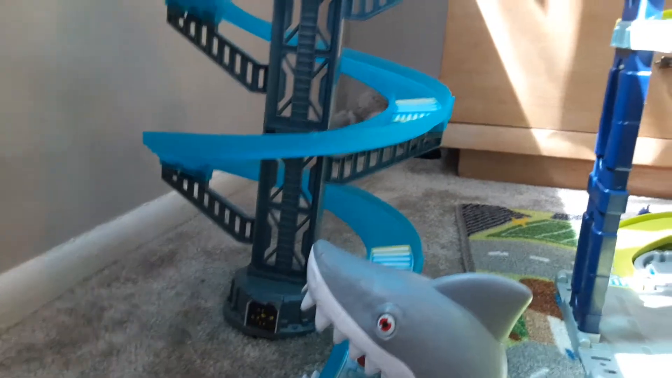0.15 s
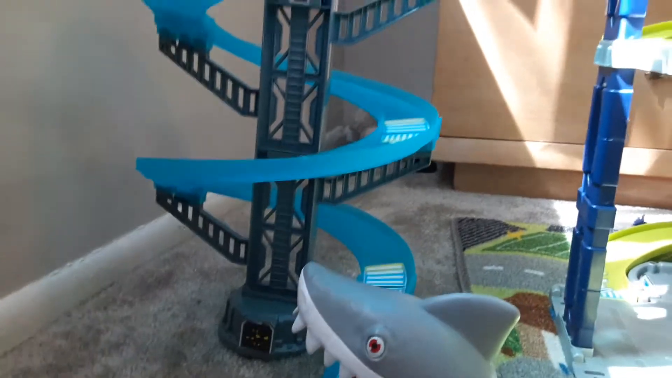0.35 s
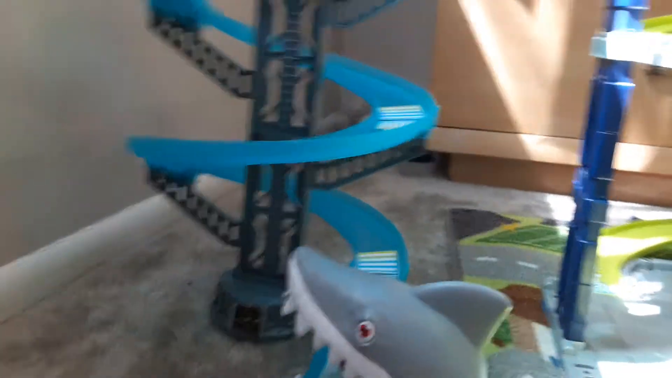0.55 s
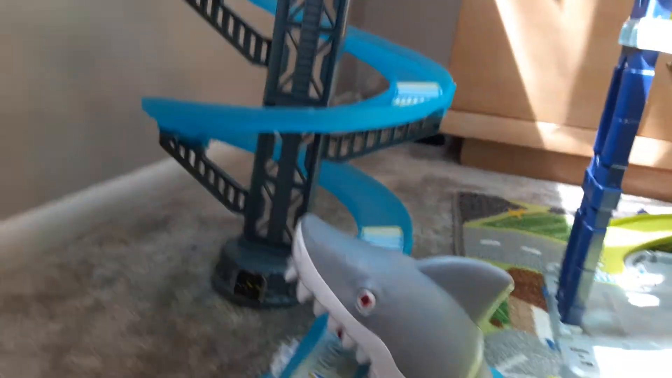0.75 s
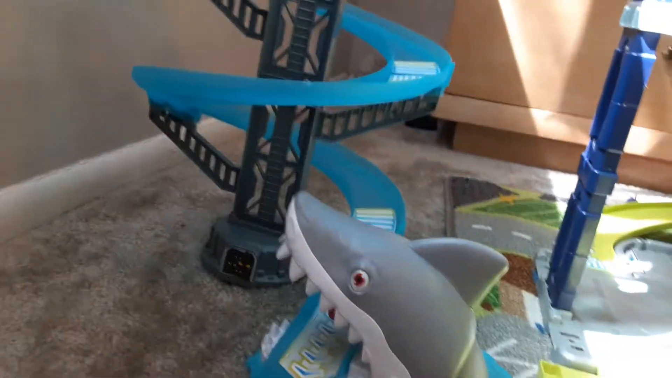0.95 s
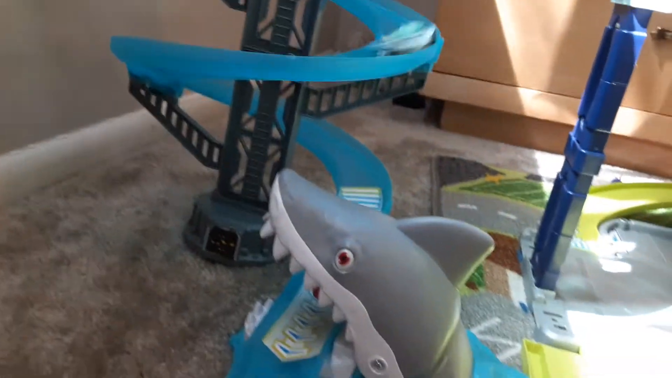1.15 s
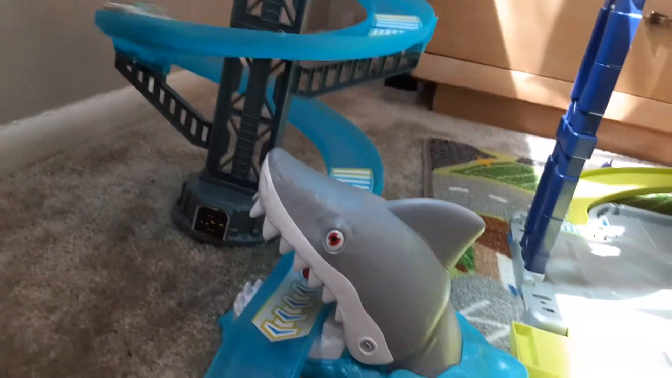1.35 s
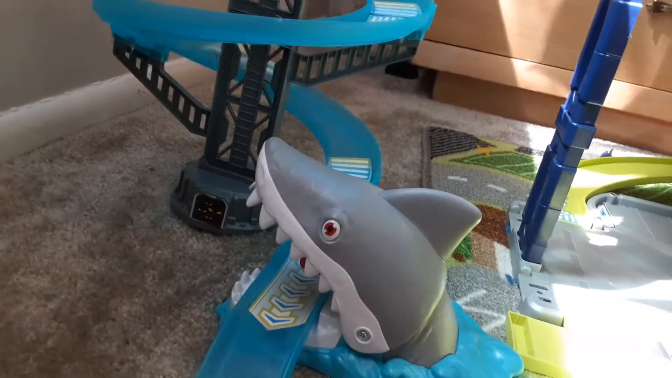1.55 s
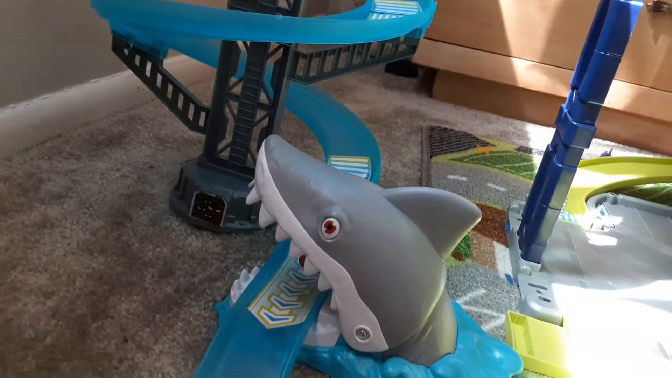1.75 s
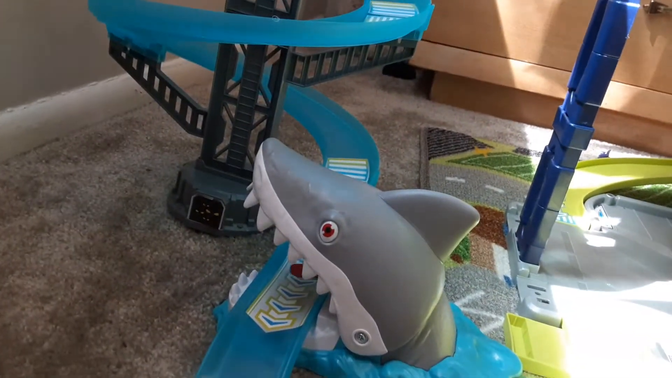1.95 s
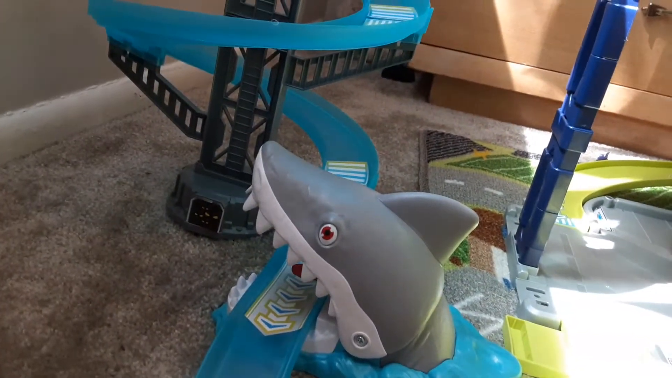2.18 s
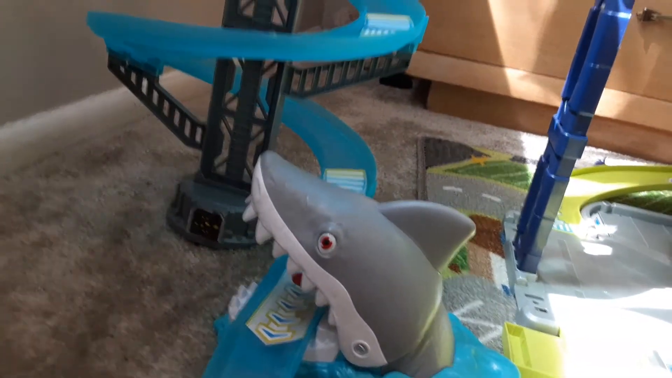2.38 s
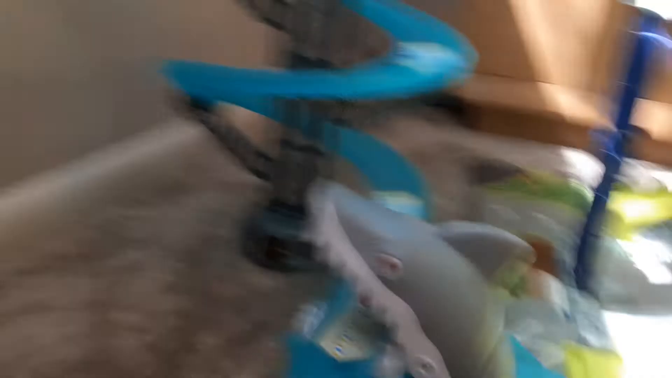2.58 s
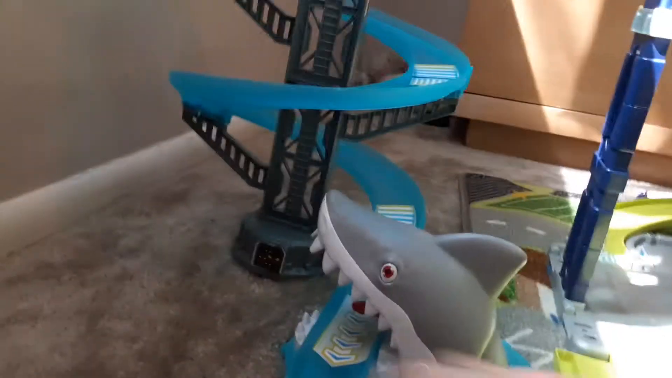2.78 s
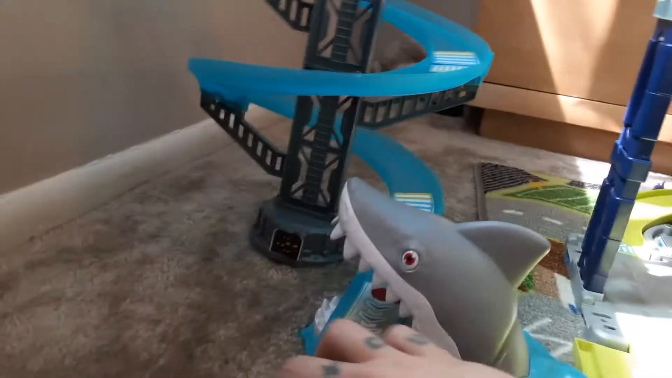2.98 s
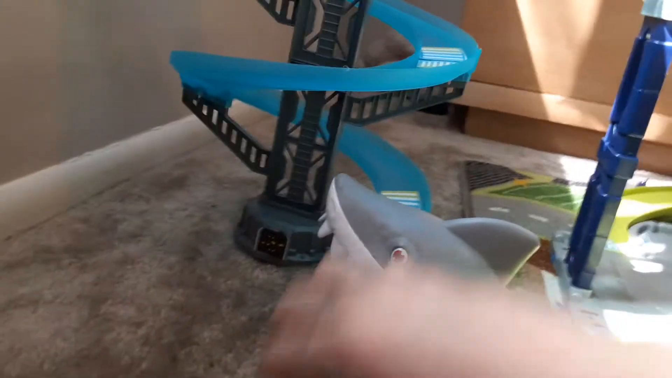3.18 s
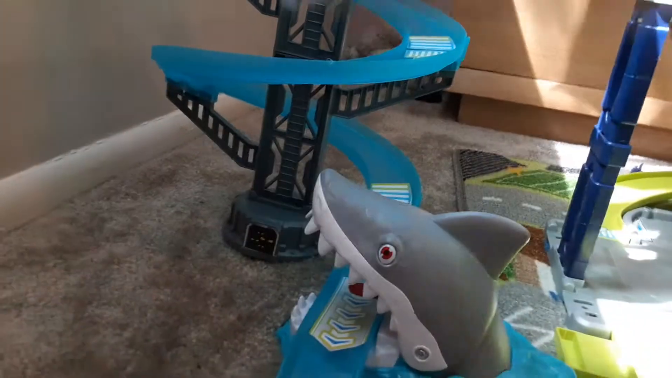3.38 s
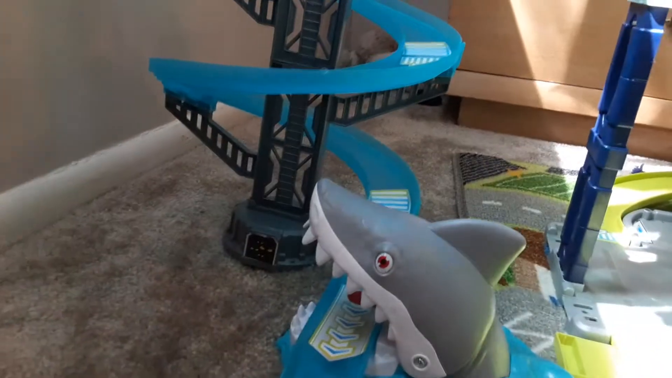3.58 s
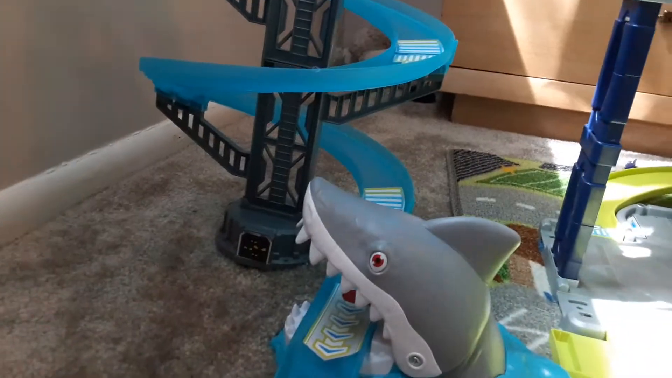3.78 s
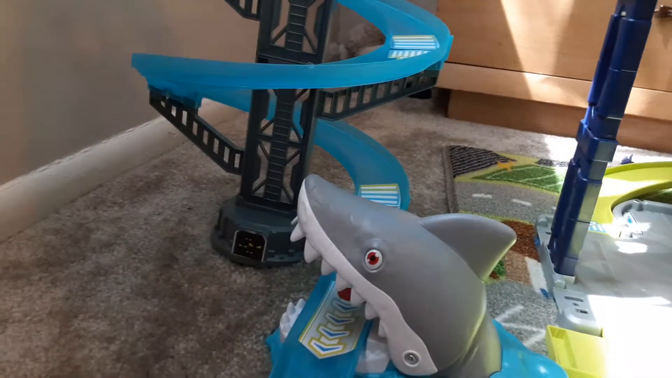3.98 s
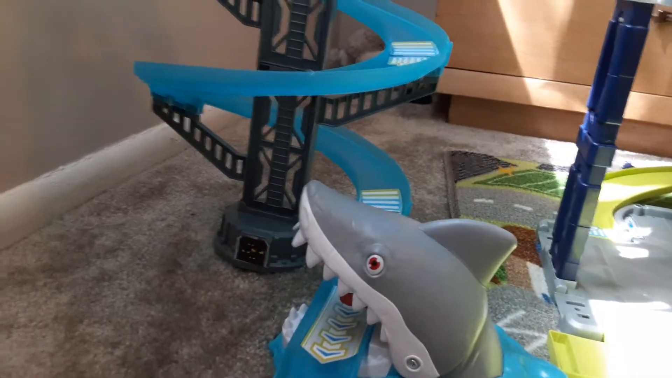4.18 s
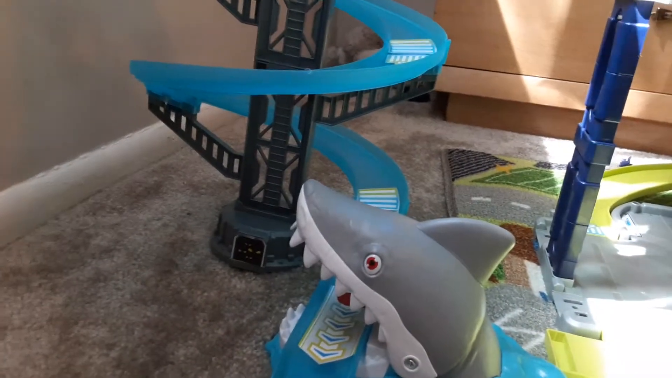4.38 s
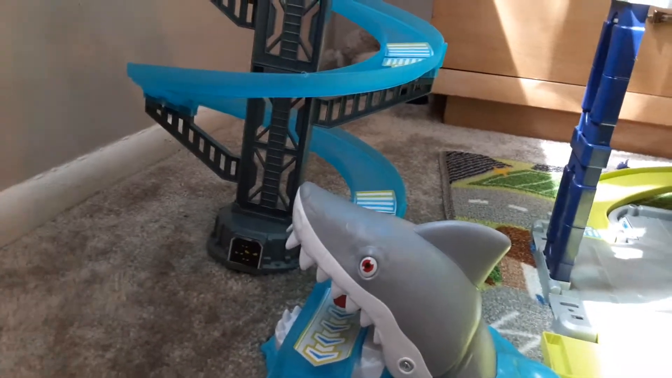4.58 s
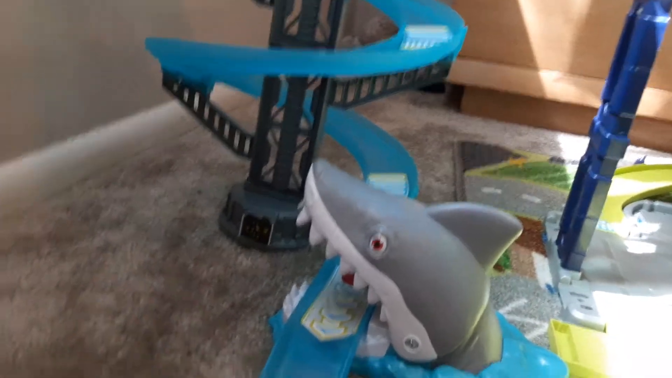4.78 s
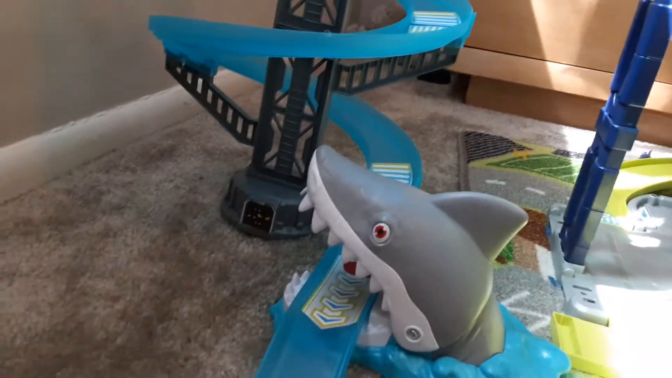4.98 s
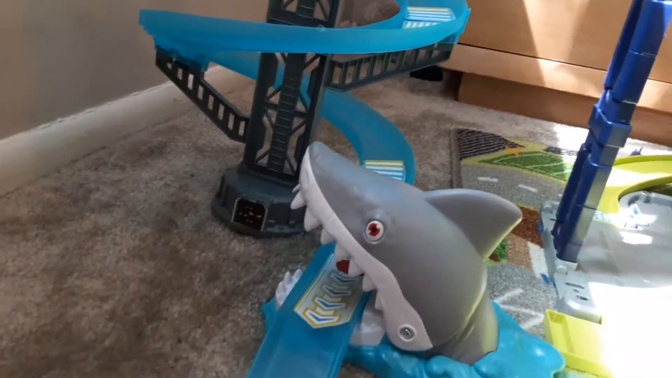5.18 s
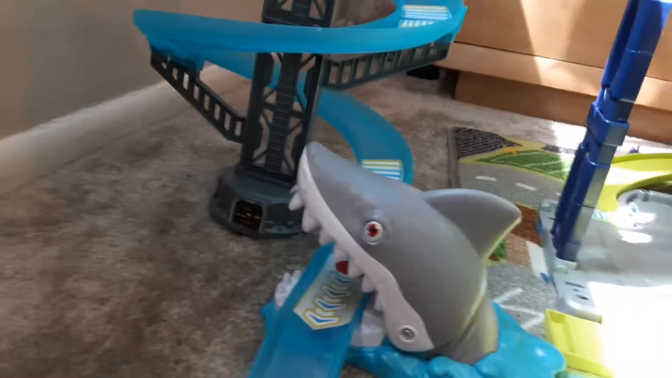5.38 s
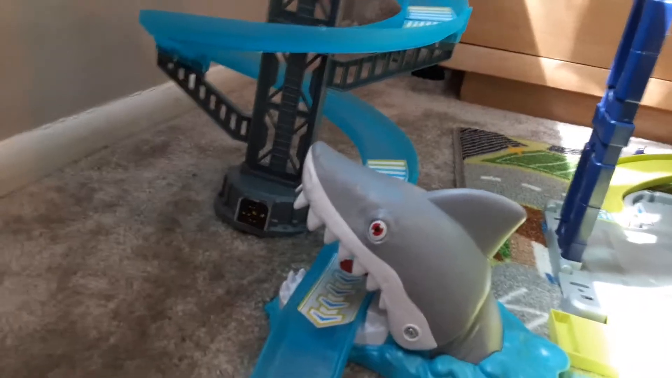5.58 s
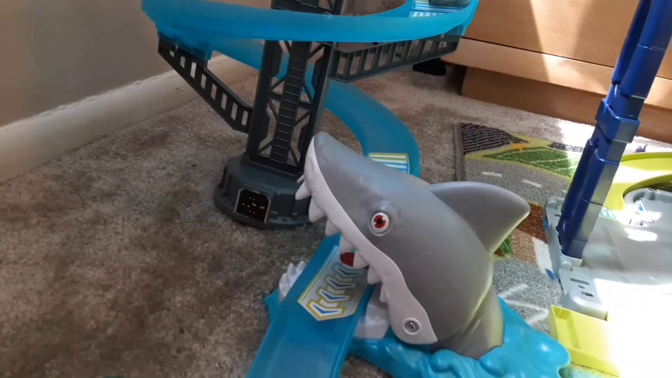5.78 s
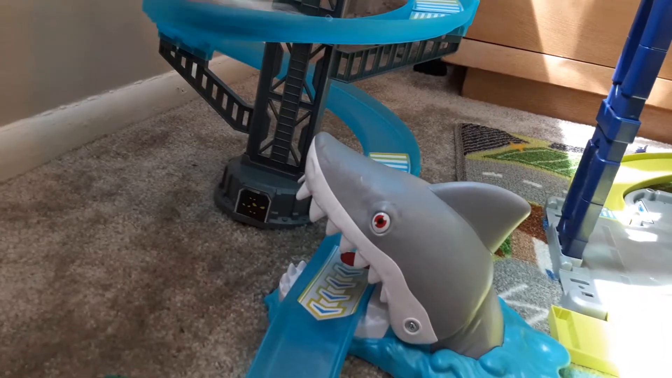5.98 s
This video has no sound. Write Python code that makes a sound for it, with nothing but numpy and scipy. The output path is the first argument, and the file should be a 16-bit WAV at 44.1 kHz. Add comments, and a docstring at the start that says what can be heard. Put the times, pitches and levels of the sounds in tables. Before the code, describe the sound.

Close by in a small, quiet room, hard little wheels rush down a spiral plastic track with a rising rattle, ending in a scrape and a quick hollow clatter. After a lull with faint cloth rustling, a toy car clicks onto the top of the plastic tower, is nudged along and rolls down again with a couple of knocks. A faint appliance hum lies underneath.

```python
"""Toy cars run down a plastic spiral ramp in a small carpeted room, over a low appliance hum.
The first rushes round ever quicker laps, its hard wheels pattering on the plastic, then skids and
clatters out through the hollow chute, leaving a faint metal ring. A sleeve rustles as an arm fetches it.
A car is set on the tower top with a few clicks, creeps off and gathers speed down the same course."""
import sys
import numpy as np
from scipy import signal
from scipy.fft import rfft, irfft
from scipy.io import wavfile

SR = 44100
rng = np.random.default_rng(int(sys.argv[2]) if len(sys.argv) > 2 else 0)


def bounce(signal):
    """Save signal as a 16-bit WAV file at the path given by the first command-line argument."""
    frames = np.transpose(np.atleast_2d(signal))
    limited = np.clip(frames, -1, 1)
    pcm = np.round(limited * 32767).astype(np.int16)
    wavfile.write(sys.argv[1], SR, pcm)


N = 266628

# appliance hum: (frequency [Hz], relative level [dB], beat depth [ratio], beat rate [Hz])
HUM_PARTIALS = [(59.2, -51.5, 0.51, 2.3), (95.3, -52, 0.13, 6), (117.4, -53.5, 1, 3.1)]
# still air of the room: (frequency [Hz], gain [dB])
AIR_COLOUR = [(20, -17), (40, -24.5), (60, -4), (120, 1), (170, -3.5), (250, -8), (400, -20), (900, -19.5),
              (2000, -31.5), (5000, -31), (8500, -47), (15000, -32.5)]
# room reverb: (frequency [Hz], t60 [s])
ROOM_DECAY = [(150, 0.46), (1200, .22), (4000, 0.25), (15000, 0.2)]
# rubbing cloth: (frequency [Hz], gain [dB])
CLOTH_COLOUR = [(180, -36.5), (300, -5), (527, -10.5), (676, -10.5), (942, -8.5), (1150, -12.5),
                (1660, -11), (9290, -12.5), (12300, -8), (15800, -12)]
# strokes of the arm: (time [s], half-width [s], level [dB], hiss trim [dB], left over right [dB])
SLEEVE_STROKES = [(2.468, 0.072, -77, 5.5, -4), (2.595, 0.041, -70.5, 9.5, -7), (2.82, 0.12, -66, 1.5, -1),
                  (3.04, 0.074, -62, -13, 0.5), (3.48, 0.085, -63, -1, 0.5), (3.76, 0.067, -62.5, -8, 0)]
# the whole toy rings as a car's weight lands: (time [s], level [dB], frequency [Hz], t60 [s])
TOY_RINGS = [(0.529, -44.5, 212, 0.61), (1.93, -64, 867, 2.0), (2.012, -26, 381, 0.016),
             (4.14, -46, 99.5, 0.45), (4.128, -44, 196, 0.27), (5.151, -43, 159, 0.36)]
# the car clacks as it is picked up, is set on the tower top and tips over the lip:
# (time [s], relative level [dB], treble [dB], t60 [s])
TOWER_CLACKS = [(3.0874, -33, 6.5, 0.033), (3.7768, -28, -0.5, 0.13), (3.8255, -30.5, -7, 0.081),
                (3.8506, -10.5, -6.5, 0.039), (3.868, -28, 2.5, 0.17), (3.9105, -24.5, -27, 0.059),
                (4.0008, -20, -11, 0.021), (4.0961, -36, -11, 0.11), (4.1131, -33.5, -4, 0.13),
                (4.1297, -13.5, -4.5, 0.045), (4.1425, -23.5, -1.5, 0.092), (4.179, -25, -5, 0.03),
                (4.2363, -31.5, -9, 0.058), (4.756, -31, -1, 0.04), (4.8075, -31, 2, 0.066)]
# broad tone of the car on the tower top: (frequency [Hz], gain [dB])
TOWER_TONE = [(150, -12), (400, -14.5), (1000, -8.5), (2500, -3), (5300, 3), (9000, -5.5), (12000, -3),
              (15800, -9.5)]
# resonances on that tone: (frequency [Hz], width [Hz], boost [dB])
TOWER_RESONANCES = [(1440, 230, 6.5), (2070, 460, 7), (2720, 300, 10), (3480, 240, 4), (4300, 69, 1.5),
                    (6660, 73, 1)]
# the running car hits joints and walls: (time [s], relative level [dB], treble [dB], t60 [s])
TRACK_BUMPS = [(1.139, -16, 10, 0.025), (1.707, -12.5, 3, 0.078), (1.7445, -15.5, 1, 0.06),
               (1.7702, -13.5, 3.5, 0.079), (1.7968, -12, 6.5, 0.099), (1.8125, -19.5, 8, 0.068),
               (1.824, -12, 5.5, 0.076), (1.843, -13.5, 7, 0.095), (1.8685, -15.5, 8, 0.08),
               (1.8865, -15, 7, 0.043), (1.9042, -13.5, 1.5, 0.06), (1.9312, -12.5, -10.5, 0.081),
               (1.9738, -11.5, 14, 0.013), (2.01, -29, 12, 0.058), (5.003, -20, 5, 0.035),
               (5.5174, -22.5, 7, 0.064)]
# broad tone of the chute at the bottom: (frequency [Hz], gain [dB])
CHUTE_TONE = [(150, -20), (350, -19.5), (700, -10.5), (1500, -10), (3000, -4), (5500, -2), (9000, -14.5),
              (15800, -15)]
# hollow resonances of the chute: (frequency [Hz], width [Hz], boost [dB])
CHUTE_RESONANCES = [(815, 150, 12.5), (1050, 49, 10), (1466, 190, 7), (1915, 600, 6), (2980, 200, 7),
                    (5420, 220, -2), (15270, 120, 5)]
# the car skids through the chute: (time [s], level [dB])
SKID_ENVELOPE = [(1.42, -41), (1.67, -28.5), (1.735, -36), (1.79, -47.5), (1.83, -29.5), (1.959, -24),
                 (1.969, -46.5)]
# wheels on plastic: (frequency [Hz], gain [dB])
WHEEL_TONE = [(120, -36.5), (200, -7.5), (547, -17), (788, -10.5), (1140, -10.5), (1440, -10), (1760, 4),
              (2080, -0.5), (2780, 0), (4010, -7), (5180, -4.5), (9470, -15.5), (12700, -10), (15800, -18)]
# ringing of the track sections: (frequency [Hz], width [Hz], boost [dB])
TRACK_RESONANCES = [(747, 45, 5.5), (967, 62, 9), (1825, 350, -5.5), (2050, 110, 6.5), (5000, 2900, 5)]
# rolling layers, a row each for rumble, boom, rush, bright rush and fizz:
# (level [dB], cut before the drop [dB], near-side lift [dB], twice-a-lap lift [dB])
ROLL_LAYERS = [(-47, 2, 0.5, -0.8), (-40, 5.5, -2.2, 3), (-30.5, 3.5, 0.1, 0.84), (-34, 2, 1, 1.94),
               (-37, 1, 1.4, 1)]
# the car is nudged along the tower top: (time [s], half-width [s], level [dB], treble [dB])
NUDGE_SWELLS = [(4.352, 0.036, -42, 0), (4.49, 0.038, -46.5, 3), (4.57, 0.059, -49.5, 3),
                (4.72, 0.09, -54.5, 6)]

RELEASES_S, RUN_S = [-0.005, 4.669], 1.705  # both runs share one course; times below count from release
PICKUP_S, PICKUP_POWER = 0.36, 0.52  # time constant and curve of the build-up
LIP_S, LIP_RISE_S, LIP_DB = 0.127, 0.0072, 4.5  # quieter until the car tips over the lip
LAPS_PER_S, LAPS_PER_S2, NEAR_LAP = 0.827, 0.774, 0.29  # starting pace, speed-up, nearest point of a lap
DROP_S, FADE_S = 0.544, 0.02  # drop onto louder track; the same fade ends the run
JOINTS_S, JOINT_WIDTH_S, JOINT_DB = [0.315, 0.565, 0.86, 1.151], 0.017, 5  # fizz over the track joints
HOLLOW_HZ, DIP_HZ, DIP_S, DIP_WIDTH_S = 1542, 188, 0.68, 0.014  # track note dips in the first far bend


def amp(db):
    """Decibels to gain."""
    return 10 ** (np.asarray(db) / 20)


def unit(x):
    """Scales to rms 1."""
    return x / np.sqrt(np.mean(x ** 2) + 1e-20)


def pan(db):
    """Left and right gains, the left louder by db."""
    return amp(np.array([[.5], [-.5]]) * db)


def bell(s, half_width_s):
    """A smooth swell of height 1 around time s."""
    return 1 / np.cosh(np.clip((np.arange(N) / SR - s) / half_width_s, -50, 50))


def ramp(s, length_s):
    """A fade from 0 to 1, starting at time s."""
    return np.clip((np.arange(N) / SR - s) / length_s, 0, 1)


def drift(top_hz):
    """A smooth random wobble of rms 1, no faster than top_hz."""
    t = np.arange(0, N + 64, 64) / SR
    wobble = sum(np.sin(2 * np.pi * (hz * t + rng.random())) for hz in np.geomspace(top_hz / 10, top_hz, 20))
    return unit(np.interp(np.arange(N) / SR, t, wobble))


def add(mix, s, sound):
    """Mixes a stereo sound in at time s."""
    part = mix[:, round(s * SR):][:, :sound.shape[1]]
    part += sound[:, :part.shape[1]]


def read(points, hz):
    """Reads a curve of (frequency [Hz], value) on a log-frequency axis."""
    point_hz, value = np.transpose(points)
    return np.interp(np.log(hz + 1), np.log(point_hz), value)


def body_db(tone, resonances, hz):
    """EQ curve of a plastic part: a broad tone with resonances standing on it."""
    return read(tone, hz) + sum(db / (1 + (2 * (hz - f) / width) ** 2) for f, width, db in resonances)


def colour(x, eq_db, size=4096):
    """Minimum-phase EQ whose gain is eq_db(hz)."""
    hz = abs(np.fft.fftfreq(size, 1 / SR))
    log_gain = np.log(amp(np.maximum(eq_db(hz), -100)))
    taps = np.fft.ifft(np.exp(np.conj(signal.hilbert(log_gain)))).real[:size // 2]
    return signal.oaconvolve(x, taps[None], axes=1)[:, :x.shape[1]]


def band(x, lo_hz, hi_hz):
    """Band-pass with soft edges."""
    hz = np.fft.rfftfreq(N, 1 / SR) + 1
    return irfft(rfft(x) / np.sqrt((1 + (lo_hz / hz) ** 12) * (1 + (hz / hi_hz) ** 12)), N)


def resonate(x, hz, width_hz):
    """A swept resonance: shift the curve hz down to zero, smooth, shift back."""
    carrier = np.exp(2j * np.pi * np.cumsum(hz) / SR)
    pole = np.exp(-np.pi * width_hz / SR)
    return 2 * (carrier * signal.lfilter([1 - pole], [1, -pole], x / carrier)).real


def stereo(common, left, right, alike, lag_samples=4, bass_hz=650):
    """Both sides share the bass and part of the treble; the shared sound reaches the right later."""
    shared = np.array([common, np.roll(common, lag_samples)])
    wide = np.sqrt(alike) * shared + np.sqrt(1 - alike) * np.array([left, right])
    lowpass = signal.butter(2, bass_hz, fs=SR, output="sos")
    return wide + signal.sosfiltfilt(lowpass, shared - wide, padtype=None)


def grit(per_s, spread_db, alike):
    """A stereo spray of tiny impacts of uneven size."""
    sprays = []
    for _ in range(3):
        size = amp(spread_db * np.minimum(rng.exponential(1, N), 4))
        sprays.append(unit(size * rng.choice([-1, 1], N) * (rng.random(N) < per_s / SR)))
    return stereo(*sprays, alike)


def background(waver_db=-0.16, wander_rad=0.3, air_db=-52.5, trim_db=-0.5, lull_db=-9):
    """A beating, wavering appliance hum over still air; the whole bed sinks for a while mid-scene."""
    t = np.arange(N) / SR
    hum = 0
    for hz, db, depth, beat_hz in HUM_PARTIALS:
        beat = 1 + depth * np.exp(2j * np.pi * (beat_hz * t + rng.random()) + 1j * drift(top_hz=4))
        tone = np.exp(2j * np.pi * hz * t + 1j * wander_rad * drift(top_hz=5.1))
        hum = hum + amp(db + waver_db * drift(top_hz=7.7)) * unit((beat * tone).real)
    noise = stereo(*rng.standard_normal((3, N)), alike=0.5)
    air = unit(colour(noise, lambda hz: read(AIR_COLOUR, hz)))
    lull = ramp(1.2, length_s=1) - ramp(3.2, length_s=1)
    return (hum + amp(air_db) * air) * amp(trim_db + lull_db * lull) * pan(3.3)


def room(x, predelay_s=0.0027, density=0.1):
    """Sparse reflections, different on each side, each band dying at its own speed."""
    size = SR // 2
    taps = rng.choice([-1., 1.], (2, size)) * (rng.random((2, size)) < density)
    taps *= np.arange(size) > predelay_s * SR
    hz, t, spectrum = signal.stft(taps, SR, nperseg=256)
    decay = amp(-60 * t / read(ROOM_DECAY, hz)[:, None])
    tail = signal.istft(spectrum * decay, SR, nperseg=256)[1]
    return signal.fftconvolve(x, tail / np.linalg.norm(tail[0]), axes=1)[:, :N]


def sleeve(hiss_db=1):
    """Fibres of cloth slip over each other with each stroke of the arm."""
    cloth = colour(grit(per_s=7400, spread_db=3.5, alike=0.12), lambda hz: read(CLOTH_COLOUR, hz))
    body, hiss = unit(band(cloth, 300, 5000)), unit(band(cloth, 5700, 18700))
    return sum(bell(s, width_s) * amp(db) * pan(side_db) * (body + amp(trim_db + hiss_db) * hiss)
               for s, width_s, db, trim_db, side_db in SLEEVE_STROKES)


def toy_rings(attack_s=0.0019):
    """Low sway of the plastic tower, and a faint metal ring as the first car clatters out."""
    t, out = np.arange(SR) / SR, np.zeros((2, N))
    attack = (1 - np.exp(-t / attack_s)) ** 2
    for s, db, hz, t60 in TOY_RINGS:
        add(out, s, pan(2.5) * amp(db - 60 * t / t60) * attack * np.sin(2 * np.pi * hz * t))
    return out


def knocks(hits, tone, resonances, trim_db, pan_db, tail_db, tail_t60, bass_db, ring_fattens, hard_thins):
    """Each knock is a burst of dense, quickly damped plastic modes, coloured by the struck part."""
    t, out = np.arange(SR // 2) / SR, np.zeros((2, N))
    eq_power = np.mean(amp(body_db(tone, resonances, np.linspace(0, SR / 2, 2048))) ** 2)
    mean_db = np.mean([hit[1] for hit in hits])
    for s, db, treble_db, t60 in hits:
        # knocks that ring longer have more body; hard blows are thinner
        low_db = bass_db + ring_fattens * 20 * np.log10(t60 / 0.07) - hard_thins * (db - mean_db)
        tilt = [(900, low_db), (2500, 0), (5000, 0), (10000, treble_db)]
        noise = stereo(*rng.standard_normal((3, len(t))), alike=0.08)
        decay = amp(-60 * t / t60) + amp(tail_db - 60 * t / tail_t60)
        crack = colour(noise * decay, lambda hz: body_db(tone, resonances, hz) + read(tilt, hz))
        add(out, s, amp(db + trim_db) * pan(pan_db) * crack / np.sqrt(eq_power))
    return out


def clacks():
    """The car clacks as it is picked up, is set on the ringing tower top and tips over the lip."""
    return knocks(TOWER_CLACKS, TOWER_TONE, TOWER_RESONANCES, trim_db=-3, pan_db=1.5,
                  tail_db=-23, tail_t60=0.41, bass_db=5, ring_fattens=0.52, hard_thins=0.44)


def bumps():
    """The car hits joints and walls; the carpet under the chute keeps the tail short."""
    return knocks(TRACK_BUMPS, CHUTE_TONE, CHUTE_RESONANCES, trim_db=-5, pan_db=4,
                  tail_db=-24, tail_t60=0.11, bass_db=0, ring_fattens=2.16, hard_thins=0.04)


def skid(pan_db=4, fade_s=0.03):
    """Coarse stick and slip of the wheels rings the hollow chute."""
    t = np.arange(N) / SR
    times, levels_db = np.transpose(SKID_ENVELOPE)
    gate = np.interp(t, [times[0] - fade_s, times[0], times[-1], times[-1] + fade_s], [0, 1, 1, 0])
    slips = grit(per_s=2500, spread_db=7, alike=0.55)
    scrape = unit(colour(slips, lambda hz: body_db(CHUTE_TONE, CHUTE_RESONANCES, hz)))
    return gate * amp(np.interp(t, times, levels_db)) * pan(pan_db) * scrape


def wall_echoes(x, delay_s=0.0011, swing_s=0.000492, sweep_hz=0.8, echo_gain=0.22):
    """Echoes off the spiral's walls lengthen and shorten as the car circles: a slow, steady flange."""
    n, out = np.arange(N), x.copy()
    for side in range(2):
        for wall in (1, 2, 3):
            sweep = np.sin(2 * np.pi * (sweep_hz * n / SR + wall / np.pi + side / np.e))
            lag_s = wall * delay_s + swing_s * sweep
            out[side] += echo_gain * np.interp(n - lag_s * SR, n, x[side])
    return out


def creep(rumble_db=-15, boom_db=-11, fizz_db=-6):
    """Gain of each rolling layer while the car is nudged toward the slope."""
    power = 0
    for s, width_s, db, treble_db in NUDGE_SWELLS:
        balance_db = np.array([rumble_db, boom_db, 0, treble_db, treble_db + fizz_db])
        power = power + np.outer(amp(db + balance_db), bell(s, width_s)) ** 2
    return np.sqrt(power)


def run_down(release_s):
    """Gain of each rolling layer as a car gathers speed, circling toward and away from the listener."""
    age = np.maximum(np.arange(N) / SR - release_s, 0)
    drive = (1 - np.exp(-age / PICKUP_S)) ** PICKUP_POWER
    drive *= 1 - ramp(release_s + RUN_S, FADE_S)
    drive *= amp(-LIP_DB * (1 - ramp(release_s + LIP_S, LIP_RISE_S)))
    angle = 2 * np.pi * (LAPS_PER_S * age + LAPS_PER_S2 * age ** 2 / 2 - NEAR_LAP)
    before_drop = 1 - ramp(release_s + DROP_S, FADE_S)
    *lower, fizz = [
        drive * amp(db - cut_db * before_drop + near_db * np.cos(angle) + twice_db * np.cos(2 * angle))
        for db, cut_db, near_db, twice_db in ROLL_LAYERS]
    joints = sum(bell(release_s + s, JOINT_WIDTH_S) for s in JOINTS_S)
    return np.array(lower + [fizz * amp(JOINT_DB * joints)])


def rolling(chatter_db=1.12, fizz_chatter_db=1.44, rush_pan_db=1.5, top_pan_db=4, hollow_width_hz=260):
    """Hard wheels patter over the plastic's grain; the track booms, the loose axles chatter and fizz."""
    contacts = grit(per_s=9000, spread_db=4, alike=0.18)
    patter = wall_echoes(colour(contacts, lambda hz: body_db(WHEEL_TONE, TRACK_RESONANCES, hz)))
    bands_hz = [(120, 1300), (1750, 3800), (3800, 7500), (7500, 20000)]
    rumble, rush, bright, fizz = (unit(band(patter, lo, hi)) for lo, hi in bands_hz)
    note_hz = HOLLOW_HZ - DIP_HZ * sum(bell(s + DIP_S, DIP_WIDTH_S) for s in RELEASES_S)
    hollow = resonate(contacts, note_hz, 2 * hollow_width_hz)
    boom = unit(resonate(hollow, note_hz, hollow_width_hz))
    chatter = drift(top_hz=130)
    fizz *= amp((fizz_chatter_db - chatter_db) * chatter)
    layers = [rumble, boom, rush * pan(rush_pan_db), bright * pan(top_pan_db), fizz * pan(top_pan_db)]
    gains = np.hypot(creep(), sum(run_down(s) for s in RELEASES_S))
    return amp(chatter_db * chatter) * sum(gain * layer for gain, layer in zip(gains, layers))


def scene(reverb_db=-9):
    """Cars and sleeve feed the room reverb; the toy's rings and the background stay dry."""
    foreground = rolling() + skid() + bumps() + clacks() + sleeve()
    return foreground + amp(reverb_db) * room(foreground) + toy_rings() + background()


def record(dry, ceiling=0.94, cutoff_hz=15900):
    """Soft-clips the loudest peaks, then cuts the very top of the treble."""
    rounded = ceiling * np.tanh(dry / ceiling)
    lowpass = signal.firwin(511, cutoff_hz, window=("kaiser", 9), fs=SR)
    return signal.oaconvolve(rounded, lowpass[None], "same")


dry = scene()
out = record(dry)
bounce(out)
```